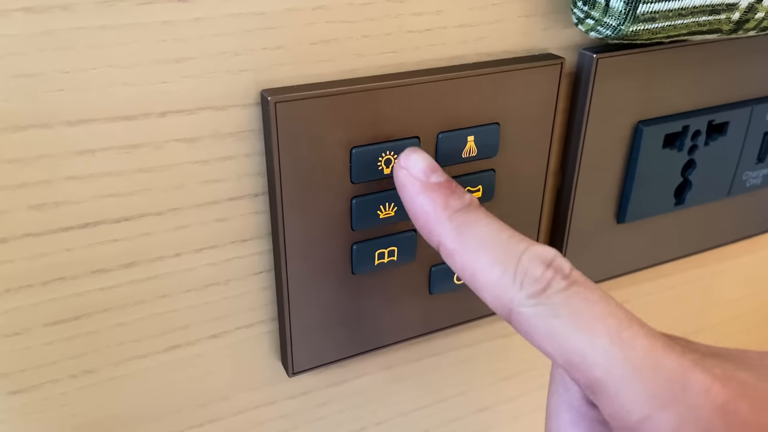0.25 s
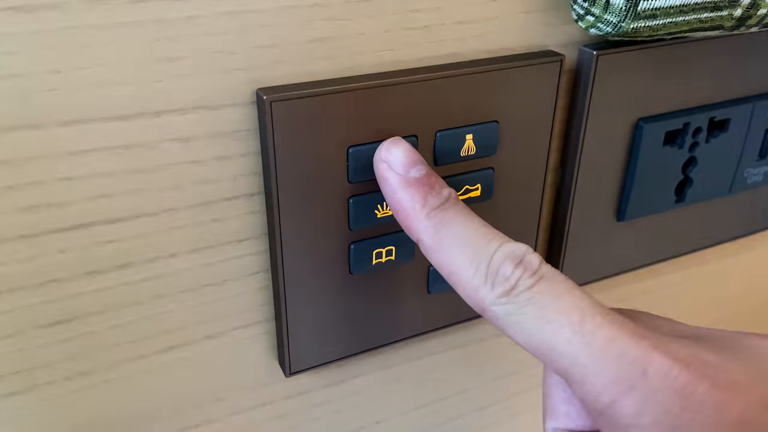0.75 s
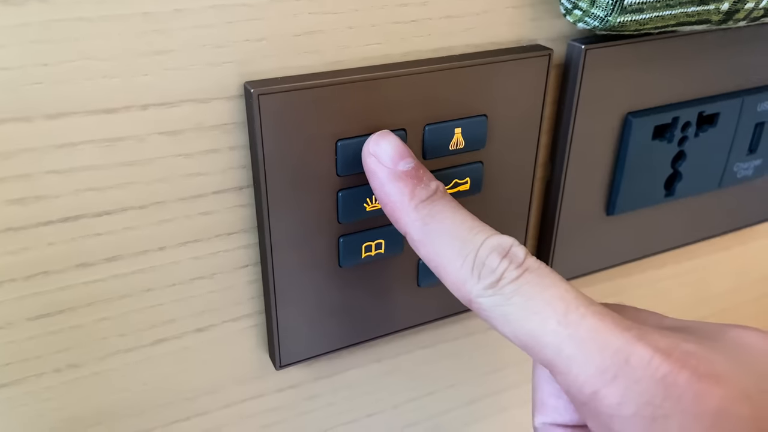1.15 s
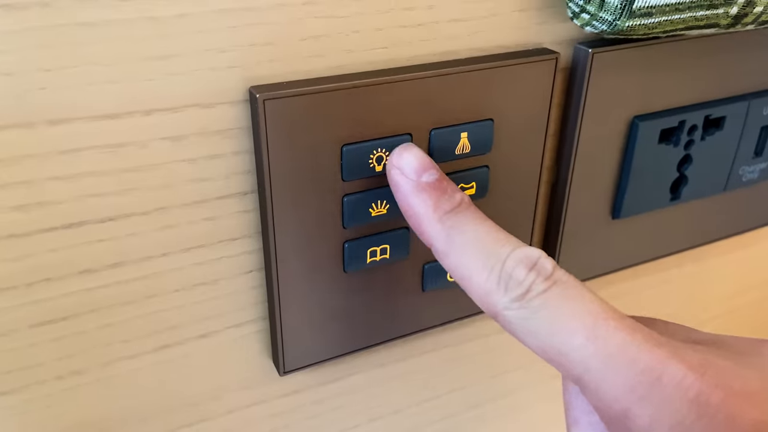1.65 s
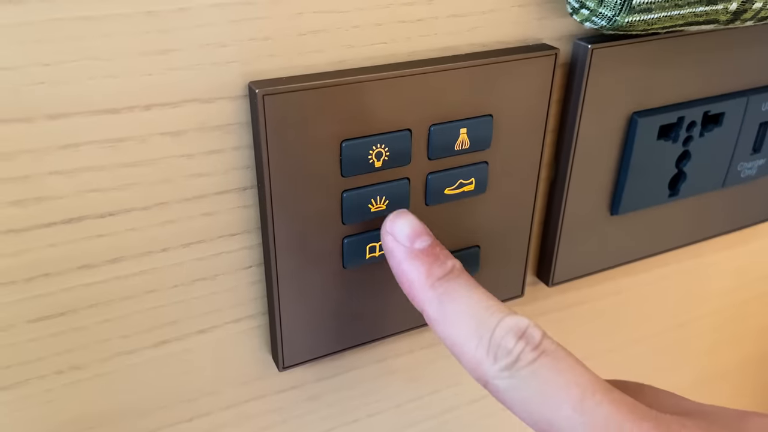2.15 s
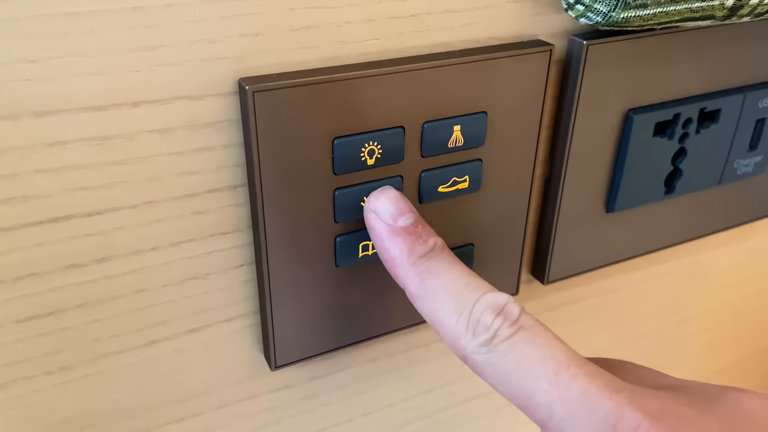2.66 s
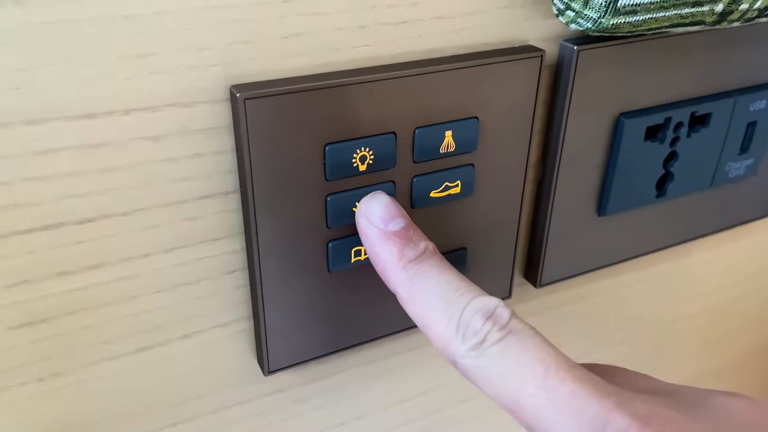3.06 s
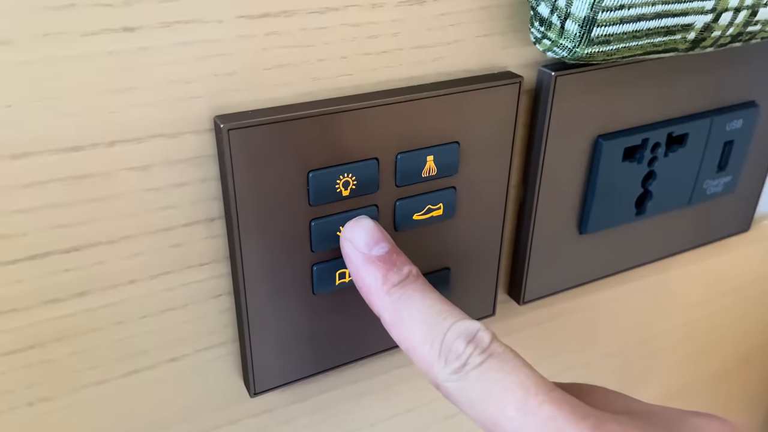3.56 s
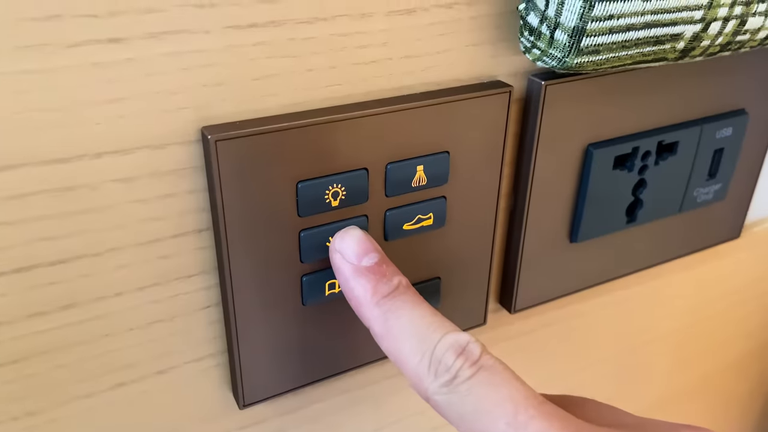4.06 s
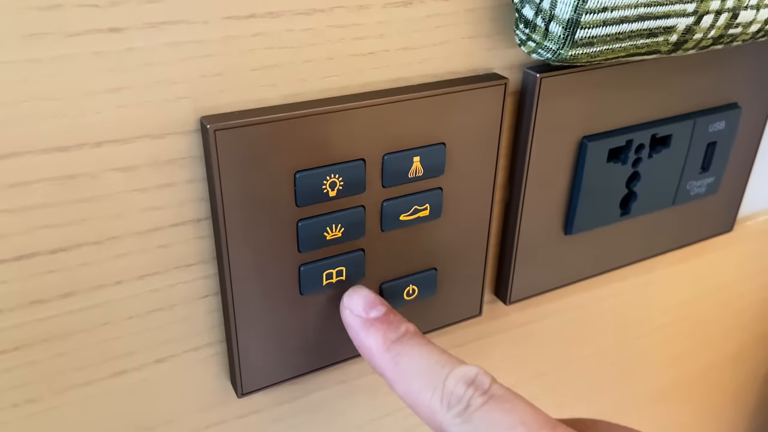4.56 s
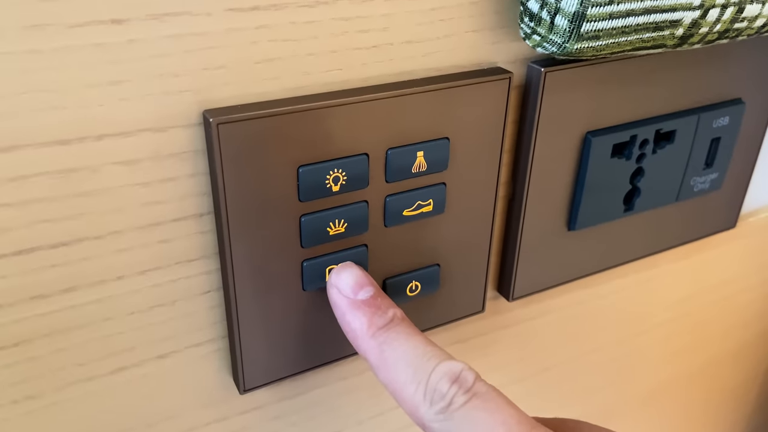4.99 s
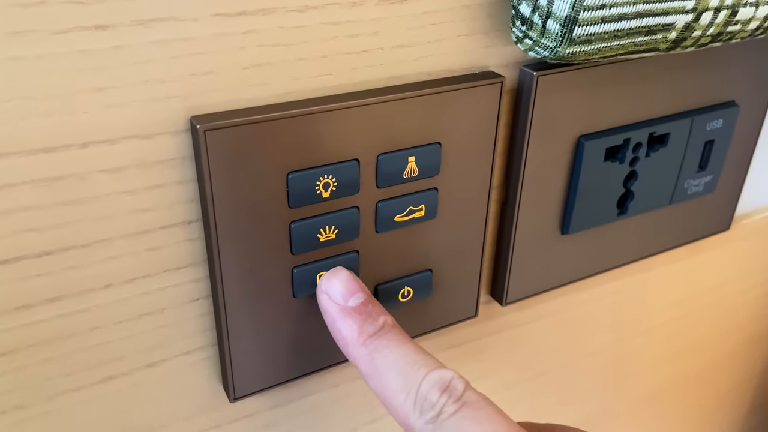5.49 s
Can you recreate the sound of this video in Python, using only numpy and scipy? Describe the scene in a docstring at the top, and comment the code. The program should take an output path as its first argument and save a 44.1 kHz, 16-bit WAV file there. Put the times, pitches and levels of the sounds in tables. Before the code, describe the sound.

Close stereo pickup of a wall panel's push-buttons in a small soft-furnished room. After a tiny knock at the start, short bright snaps come in pairs, down then up, with pauses where each key is held. The first key snaps four times, the middle key four, the lowest twice at the end. A deep drone rises and swells underneath, with faint ventilation rumble and hiss.

```python
"""A finger presses three push-buttons of a wall panel beside a bed; each key snaps going down and again
coming up, as a sum of dying tones started by one blow. Small knocks, ticks, brushes and a scrape nearby
are short filtered noise bursts. A soft-furnished room answers briefly, with noise that dies band by band.
A far engine gathering speed drones through the walls as a gliding tone, over ventilation rumble and hiss
made of coloured noise. Two microphone ports a few centimetres apart hear it all."""
import sys
import numpy as np
from scipy import signal
from scipy.fft import rfft, irfft, next_fast_len
from scipy.io import wavfile

SR = 44100
rng = np.random.default_rng(int(sys.argv[2]) if len(sys.argv) > 2 else 0)


def transcribe(signal):
    """Save signal, clipped to [-1, 1], as a 16-bit WAV file at the path in sys.argv[1]."""
    frames = np.atleast_2d(signal).T
    limited = np.clip(frames, -1, 1)
    pcm = np.round(limited * 32767).astype(np.int16)
    wavfile.write(sys.argv[1], SR, pcm)


def gain_from_decibels(decibels):
    """Convert decibel values to linear amplitude factors."""
    exponent = np.asarray(decibels, float) / 20
    return 10 ** exponent


N = 252693
T = np.arange(N) / SR   # time of every sample in seconds

# When the finger goes on to the next key down: a plain list of times in seconds.
FINGER_MOVES = [2.0, 4.6]
# Snaps of the switches under the keys, and one light touch on a cap.
# Each row: start in seconds, peak of the left-right mean in dB, brightness in dB per octave going up
# from 2 kHz, weight in dB per octave going down from 2 kHz, left minus right in dB.
KEY_SNAPS = [(0.5977, -25.5, -1.5, 0.25, 1.17), (0.721, -20, -0.83, -2.2, 0.4), (1.304, -25.5, -1, 0.9, 1),
             (1.4672, -20.5, -0.55, -1, 0.48), (2.4422, -41.5, -4, -5.5, 1),
             (2.714, -22.5, -1.1, 0.3, -0.9), (2.908, -19, 0.04, 0.7, 0.58),
             (3.695, -23.5, -0.84, 1, -0.11), (3.869, -19.5, 0.15, 0.6, 1.8), (5.5724, -24, 0.3, 1, -0.41),
             (5.714, -19, 3.5, 2.5, -1.9)]
# How alike the air noise is at the two ports. Each row: frequency in Hz, likeness from -1 to 1.
PORT_LIKENESS = [(60, 1), (130, 0.84), (290, 0.51), (640, -0.64), (1410, 0.22), (3100, -0.63), (6820, 0.1),
                 (15000, -0.78)]
# How far the left port lags behind the right. Each row: frequency in Hz, lag in radians.
PORT_LAG = [(60, 0.85), (250, .5), (600, .1)]


def amp_sides(db):
    """Left and right gains for a level difference."""
    return gain_from_decibels(np.array([[db], [-db]]) / 2)


def rms_one(x):
    """Scale to unit rms."""
    return x / np.sqrt(np.mean(x ** 2) + 1e-20)


def in_time(rows):
    """Read a curve of (seconds, value) rows at every sample."""
    seconds, values = np.transpose(rows)
    return np.interp(T, seconds, values)


def at_hz(points, hz):
    """Read a curve of (Hz, value) rows on a log-frequency axis."""
    point_hz, values = np.transpose(points)
    return np.interp(np.log(hz), np.log(point_hz), values)


def band(x, hz, octaves):
    """Band-pass around a centre."""
    edges = np.clip(hz * 2 ** (np.array([-.5, .5]) * octaves), 10, SR / 2 - 500)
    return signal.sosfilt(signal.butter(2, edges, "band", fs=SR, output="sos"), x)


def add(out, sound, s):
    """Mix a short sound in at a time in seconds."""
    i = round(s * SR)
    out[:, i:i + sound.shape[1]] += sound[:, :N - i]


def blow_tilt_db(hz, bright_db, weight_db):
    """A blow can favour or spare the highs and the lows, pivoting at 2 kHz."""
    octaves = np.log2(hz / 2000)
    return np.where(octaves > 0, bright_db * octaves, -weight_db * octaves)


def snap(modes, bright_db, weight_db):
    """All modes of a key start from one blow; bending waves bring the low ones later."""
    hz, t60, left_db, right_db, lead = np.array(modes).T[:, :, None]
    arrival = .001 * np.sqrt(1000 / hz)
    t = np.maximum(np.arange(SR // 8) / SR - arrival, 0)
    decay = gain_from_decibels(blow_tilt_db(hz, bright_db, weight_db) - 60 * t / t60)
    swing = decay * (1 - np.exp(-t * hz))   # each mode needs about a cycle to build up
    swing = swing * (-1) ** np.arange(len(hz))[:, None]   # neighbouring modes move the air in opposite sense
    left = np.sum(gain_from_decibels(left_db) * swing * np.sin(2 * np.pi * hz * t + lead / 2), axis=0)
    right = np.sum(gain_from_decibels(right_db) * swing * np.sin(2 * np.pi * hz * t - lead / 2), axis=0)
    return np.array([left, right]) / np.max(np.abs(left + right) / 2)


def keys():
    """The finger works its way down the three keys; the dense high modes blur into a short rattle."""
    # What each key and the plate around it ring with. Each row: frequency in Hz, time to die by 60 dB
    # in seconds, left and right level in dB (relative), how far the left leads in radians.
    upper_modes = [(455, 0.0041, -18.3, -18.3, 0.3), (520, 0.0665, -42.5, -51.1, -2.39),
                   (610, 0.0168, -70.0, -47.8, -6.3), (676, 0.0706, -62.9, -38.4, -2.25),
                   (770, 0.0106, -23.4, -26.5, 0.53), (813, 0.0548, -33.3, -36.6, 1.4),
                   (970, 0.0059, -12.4, -23.2, 2.09), (1092, 0.0621, -42.4, -38.5, 1.61),
                   (1130, 0.01, -24.4, -21.1, 1.35), (1397, 0.0532, -46.4, -59.7, 6.1),
                   (1584, 0.0418, -31.3, -35.4, 1.57), (1879, 0.0296, -34.6, -44.4, -1.08),
                   (2148, 0.0154, -39.2, -35.9, 2.69), (2311, 0.004, -27.5, -23.2, 1.53),
                   (2949, 0.0376, -43.7, -46.6, -2.42), (3158, 0.0218, -32.2, -36.3, 3.48),
                   (3855, 0.0058, -26.9, -25.9, -0.89), (4240, 0.012, -27, -27, -1.08),
                   (4828, 0.004, -19.7, -24.9, 0.08), (5942, 0.0221, -36.8, -37.5, 0.58),
                   (6023, 0.0053, -19.1, -20.2, 0.63), (7078, 0.0045, -24.7, -24.9, 1.5),
                   (8637, 0.0079, -33.7, -37.8, -1.73), (9232, 0.0064, -32.2, -31.9, -3.4),
                   (10747, 0.0064, -26.6, -24.0, 0.08), (11294, 0.0191, -40.6, -42.6, 0.14),
                   (12383, 0.004, -26.4, -28.9, -1.19), (13321, 0.0083, -32.6, -31.9, -3.47),
                   (14429, 0.0067, -27.2, -29.8, 1.78), (15004, 0.004, -25.1, -29.1, 0.04)]
    middle_modes = [(429, 0.0117, -70.0, -31.6, 3.19), (498, 0.0902, -48.1, -70.0, -0.07),
                    (602, 0.0845, -43.9, -51.5, 1.18), (694, 0.0177, -21.9, -12.5, -1.84),
                    (705, 0.0175, -27.7, -11.7, -1.65), (809, 0.0712, -38.0, -37.9, 0.47),
                    (958, 0.0135, -26.0, -37.3, 1.9), (1125, 0.0603, -43.7, -42.2, 0.66),
                    (1288, 0.0138, -28.1, -32.8, 1.39), (1443, 0.0525, -46.0, -51.7, 2.17),
                    (1565, 0.0514, -36.8, -37.4, 1.67), (1869, 0.03, -25, -35, 0.46),
                    (1945, 0.03, -35, -33, 0.26), (2637, 0.0048, -17.5, -13.1, 1.52),
                    (2672, 0.017, -28.1, -23.0, 2.03), (3097, 0.0066, -21.2, -18.0, -2.39),
                    (3667, 0.0188, -32.9, -32.9, -1.36), (3918, 0.0326, -37.2, -45.8, -0.78),
                    (4797, 0.0071, -23.9, -20.1, -0.49), (5170, 0.0227, -27.9, -36.0, 4.12),
                    (5958, 0.0067, -25.0, -23.4, 0.67), (7812, 0.0107, -20.3, -31.4, -2.57),
                    (8481, 0.0117, -31.5, -70.0, -1.12), (9186, 0.0109, -35.2, -35.2, -2.02),
                    (10460, 0.0164, -35.9, -39.4, 1.52), (11861, 0.0047, -21.5, -21.8, -0.55),
                    (13114, 0.0049, -22.1, -24.0, -3.53), (12726, 0.0051, -70.0, -30.6, 2.51),
                    (14156, 0.0076, -26.2, -28.3, 1.51), (15543, 0.0087, -36.7, -41.8, -0.78)]
    lower_modes = [(462, 0.0091, -27.7, -33.2, 1.14), (515, 0.0915, -46.1, -56.1, 0.67),
                   (565, 0.004, -70.0, -23.0, 3.62), (652, 0.0801, -43.7, -54.2, 0.18),
                   (741, 0.0764, -47.6, -41.9, 0.79), (836, 0.0703, -42.9, -54.7, 2.2),
                   (985, 0.0634, -40.5, -39.9, 2.27), (1122, 0.0302, -70.0, -22.2, -1.98),
                   (1146, 0.0392, -23.0, -24.1, -0.52), (1371, 0.0112, -27.9, -28.4, 2.04),
                   (1568, 0.0503, -44.6, -48.2, -4.88), (1660, 0.0487, -47.3, -52.8, -0.68),
                   (2160, 0.043, -49.3, -54.4, 6.3), (2425, 0.0176, -30.1, -30.4, 2.36),
                   (2887, 0.0376, -39.1, -37.5, -2.23), (3200, 0.0185, -30, -28, -2.89),
                   (3674, 0.0072, -25.0, -22.2, -1.74), (4124, 0.0292, -40.4, -39.7, -0.56),
                   (4577, 0.0085, -47.9, -30.9, -1.89), (5493, 0.0082, -26.3, -31.2, 1.26),
                   (6873, 0.0092, -34.7, -35.3, -0.31), (7525, 0.004, -27.1, -26.6, 2.76),
                   (8207, 0.0176, -44.2, -70.0, -2.46), (9676, 0.0108, -47.2, -42.4, 3.8),
                   (10475, 0.004, -39.0, -39.9, 1.75), (11904, 0.005, -36.8, -34.3, -0.68),
                   (13286, 0.0063, -39.7, -34.1, -3.51), (13781, 0.004, -32.9, -33.5, 1.87),
                   (14660, 0.0077, -36.1, -36.0, 0.92), (15596, 0.0095, -37.4, -42.6, -0.17)]
    travel_s = 0.00051   # from key to microphones
    out, t = np.zeros((2, N)), np.arange(SR // 16) / SR
    bursts = rng.standard_normal((len(KEY_SNAPS), 2, len(t)))
    for (s, peak_db, bright_db, weight_db, pan_db), burst in zip(KEY_SNAPS, bursts):
        modes = [upper_modes, middle_modes, lower_modes][np.searchsorted(FINGER_MOVES, s)]
        ring = snap(modes, bright_db, weight_db)
        add(out, gain_from_decibels(peak_db) * amp_sides(pan_db) * ring, s + travel_s)
        rattle_gain = gain_from_decibels(peak_db + bright_db - 16 - 60 * t / 0.048)   # dies by 60 dB in 48 ms
        add(out, rattle_gain * band(burst, 3300, 2.4), s + travel_s + 0.0013)
    return out


def knocks():
    """Each is a dying burst of noise, narrow or broad, around its own centre."""
    # Small knocks, ticks, brushes and a scrape nearby. Each row: start in seconds, peak in dB,
    # centre in Hz, width in octaves, time for the burst to die by 60 dB in seconds.
    small_sounds = [(0.0138, -38, 1130, 0.76, 0.013), (0.0150, -42.5, 435, 0.58, 0.029),
                    (0.063, -57, 1100, 1.8, 0.025), (0.110, -59, 1910, 5.1, 0.0048),
                    (2.387, -71.5, 3970, 0.29, 0.56), (4.278, -62.5, 900, 0.54, 0.063),
                    (4.368, -55, 1970, 0.83, 0.027), (4.392, -70, 3730, 0.47, 0.2),
                    (4.562, -58, 905, 1.5, 0.12), (4.926, -41.5, 397, 1.47, 0.039),
                    (4.922, -53.5, 1820, 1.13, 0.33), (4.940, -44, 170, 1.6, 0.24),
                    (4.995, -44, 120, 1.2, 0.14), (5.165, -56, 3503, 4.9, 0.012)]
    out, t = np.zeros((2, N)), np.arange(SR // 4) / SR
    bursts = rng.standard_normal((len(small_sounds), 3, len(t)))
    for (s, peak_db, hz, octaves, t60), (both, *own) in zip(small_sounds, bursts):
        push = (both + 0.5 * np.array(own)) * gain_from_decibels(-60 * t / t60)
        soft_push = signal.lfilter([1], [1, -.8], push)   # soft contacts favour the low end
        burst = band(soft_push, hz, octaves)
        add(out, gain_from_decibels(peak_db) * burst / np.max(np.abs(burst)), s)
    return out


def blows():
    """What the walls receive: one click a snap in the key's broad colour, tilted as the blow is."""
    # Colour each key sends to the walls, averaged over all directions.
    # Each row: frequency in Hz, relative level in dB per Hz.
    upper_spread = [(260, -31), (450, -0.5), (659, -8), (858, -3.5), (1370, -5), (1520, -2), (1920, -9.5),
                    (3670, -9.5), (4120, -6), (8850, -17), (11400, -14.5), (12600, -21.5), (13100, -47.5),
                    (13700, -22), (15000, -21.5)]
    middle_spread = [(260, -33.5), (450, -5.5), (741, -6), (1390, -10), (1520, -2.5), (2360, -8.5),
                     (2990, 2.5), (4120, -14), (4570, -1.5), (5200, -12), (8100, -13.5), (9240, -22.5),
                     (11700, -14.5), (13300, -29), (15000, -16.5)]
    lower_spread = [(260, -42), (450, -5), (951, -1.5), (1150, 7), (1280, -8), (1520, -7), (2660, -4),
                    (3080, 2), (4920, -9), (7640, -18), (11900, -28), (13100, -41), (15000, -24)]
    out, hz = np.zeros((2, N)), np.maximum(np.arange(257) * SR / 512, 1)
    for s, peak_db, bright_db, weight_db, _ in KEY_SNAPS:
        spread = [upper_spread, middle_spread, lower_spread][np.searchsorted(FINGER_MOVES, s)]
        colour_db = at_hz(spread, hz) + blow_tilt_db(hz, bright_db, weight_db)
        click = np.roll(irfft(gain_from_decibels(peak_db + colour_db)), 256) * np.hanning(512)
        add(out, np.array([click, click]), s)
    return out


def room(x):
    """Reflections build up while sound comes back from the nearest wall, then die band by band."""
    # How long the room rings. Each row: frequency in Hz, time to die by 60 dB in seconds.
    ring_times = [(300, .3), (1000, 0.35), (3200, 0.25), (6000, 0.29), (10000, 0.3), (15000, 0.14)]
    first_wall_s = 0.01
    t = np.arange(SR // 2) / SR
    response, onset = 0, np.clip(t / first_wall_s, 0, 1) ** 2
    for hz in 250 * 2. ** np.arange(0, 6.1, .5):   # half-octave bands
        noise = rms_one(band(rng.standard_normal((2, len(t))), hz, .5))
        noise = noise * np.sqrt(hz / SR / 2000)   # wider bands carry more power
        response = response + noise * gain_from_decibels(-6 - 60 * t / at_hz(ring_times, hz))
    return signal.fftconvolve(x, response * onset, axes=1)[:, :N]


def engine():
    """Only the firing tone gets through the walls, swelling as it crosses room resonances."""
    # The engine gathers speed, eases off, and its tone falls at a gear change.
    # Each row: time in seconds, firing tone in Hz.
    firing_tone = [(0.0, 44.76), (1.2, 53.2), (2.4, 62.2), (3.9, 72.93), (5.1, 79.2), (5.5, 76.6),
                   (5.73, 68.8)]
    # Level of that tone indoors. Each row: time in seconds, rms level in dB, midway between left and right.
    tone_level = [(0.0, -63.5), (0.36, -45.5), (0.5, -61.5), (0.98, -56.5), (1.16, -46.5), (1.58, -38),
                  (1.74, -42), (1.87, -40.5), (2.2, -32.5), (2.47, -37.5), (2.68, -53.5), (2.77, -40),
                  (3.11, -51.5), (3.27, -46), (3.34, -64.5), (3.46, -43), (3.89, -43), (4.2, -54.5),
                  (4.37, -45), (4.57, -63.5), (4.8, -50.5), (5.5, -68), (5.63, -40.5), (5.73, -47.5)]
    hz = in_time(firing_tone)
    lag = at_hz(PORT_LAG, hz) * np.array([[-.5], [.5]])
    phase = 2 * np.pi * np.cumsum(hz) / SR + lag
    return np.sqrt(2) * gain_from_decibels(in_time(tone_level)) * amp_sides(-3.5) * np.sin(phase)


def drift(rate):
    """Slow random wander: straight lines between random knots of spread 1, rate knots a second."""
    knots = rng.standard_normal(int(N / SR * 40) + 2)
    return np.interp(T * rate, np.arange(len(knots)), knots)


def air_noise(spectrum, patchy_db):
    """Stereo noise of a given colour, its level flickering; the ports agree more or less with frequency."""
    # Balance of the two ports. Each row: frequency in Hz, left minus right in dB.
    port_tilt = [(60, -3.5), (110, -2), (200, -4.5), (380, 2), (700, -2.5), (1290, 1), (2380, 10),
                 (4400, -1), (8120, -1), (15000, 1.5)]
    size = next_fast_len(N)
    hz = np.maximum(np.arange(size // 2 + 1) * SR / size, 1)
    alike = np.clip(at_hz(PORT_LIKENESS, hz), -1, 1)
    mid, side = rfft(rng.standard_normal((2, size)))
    both = np.sqrt(1 + alike) * mid + np.sqrt(1 - alike) * side * [[1], [-1]]
    both = both * np.exp(1j * at_hz(PORT_LAG, hz) * np.array([[-.5], [.5]]))
    colour_db = at_hz(spectrum, hz) + at_hz(port_tilt, hz) * np.array([[.5], [-.5]])
    noise = irfft(both * gain_from_decibels(colour_db), size)[:, :N]
    return rms_one(noise) * gain_from_decibels(patchy_db * drift(9.0))


def ventilation():
    """Rumble, steady hiss and a few narrow humps from fan and ducts."""
    # Colours of rumble and hiss. Each row: frequency in Hz, relative level in dB per Hz.
    rumble_colour = [(13, -40), (22, -11), (32, -8.5), (86, 3), (114, -1.5), (150, -13), (201, -8.5),
                     (286, -25.5), (368, -21.5), (417, -30.5), (450, -25), (580, -49.5), (990, -120)]
    hiss_colour = [(180, -42.5), (300, -15), (370, -2.5), (434, -14.5), (486, -9.5), (535, -6.5), (787, -6),
                   (970, -11), (1200, -9), (1320, -12), (1910, -11), (4470, -27), (8100, -30.5),
                   (10700, -28), (14000, -45.5)]
    # Narrow humps in the air noise. Each row: centre in Hz, width in Hz, rms level in dB before its wander.
    noise_humps = [(260.6, 11, -74.5), (193.3, 36, -70), (820, 120, -81.5), (9430, 190, -97.5),
                   (10360, 580, -92)]
    hiss = gain_from_decibels(-71) * air_noise(hiss_colour, patchy_db=.2)
    rumble_gain = gain_from_decibels(-53 + 1.74 * drift(1.7))
    out = rumble_gain * air_noise(rumble_colour, patchy_db=3.5) + hiss
    for hz, width_hz, level_db in noise_humps:
        both, *own = rng.standard_normal((3, N))
        alike = np.clip(at_hz(PORT_LIKENESS, hz), 0, 1)
        noise = np.sqrt(alike) * both + np.sqrt(1 - alike) * np.array(own)
        hump = rms_one(band(noise, hz, width_hz / hz / np.log(2)))   # width turned into octaves
        out += gain_from_decibels(level_db + 1.5 * drift(3.3)) * hump
    return out


def scene():
    """Panel sounds in the room over the steady background."""
    small = knocks()
    to_walls = gain_from_decibels(22.5) * blows() + small
    return keys() + small + room(to_walls) + engine() + ventilation()


def band_limit(x):
    """A steep low-pass at the top of the band."""
    return signal.sosfilt(signal.butter(12, 17080, fs=SR, output="sos"), x)


def record(dry):
    """The microphones lose the deepest bass, below about 38 Hz."""
    cut = signal.sosfilt(signal.butter(2, 38, "high", fs=SR, output="sos"), dry)
    return band_limit(cut)


dry = scene()
out = record(dry)
transcribe(out)
```